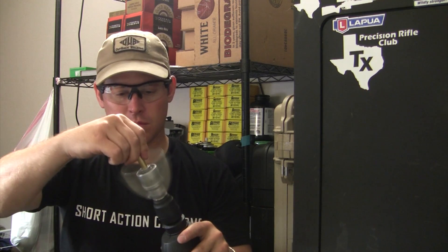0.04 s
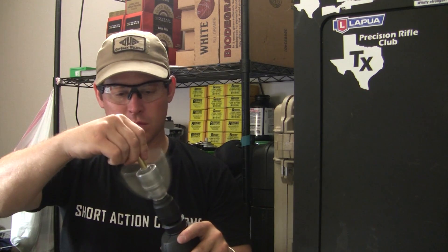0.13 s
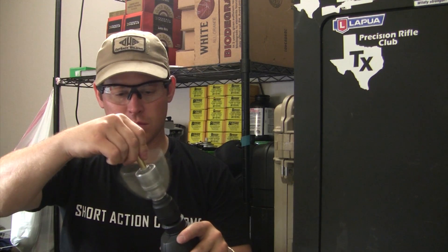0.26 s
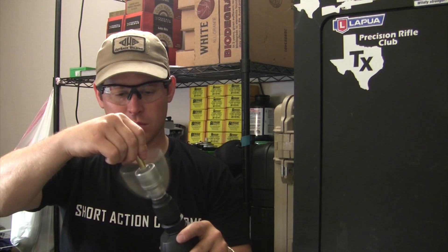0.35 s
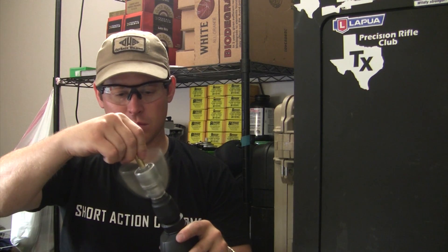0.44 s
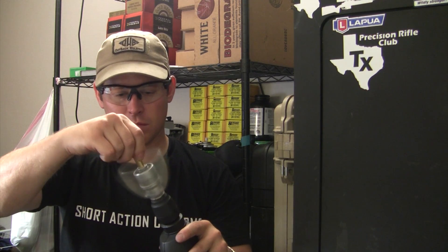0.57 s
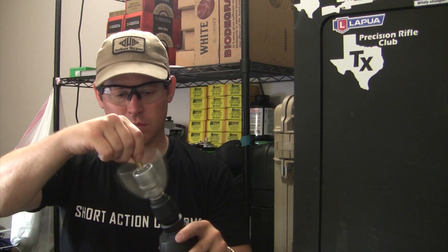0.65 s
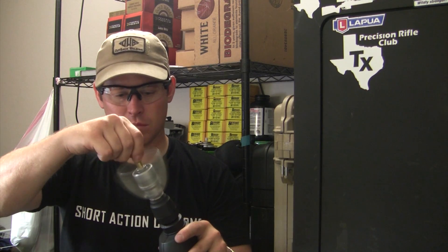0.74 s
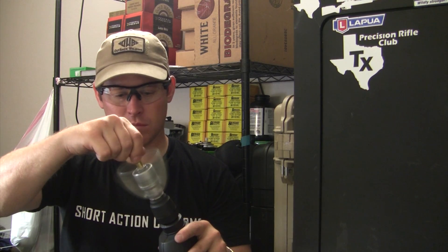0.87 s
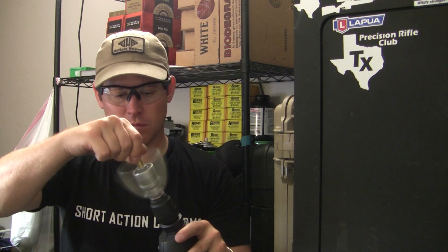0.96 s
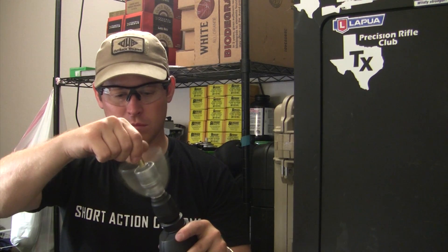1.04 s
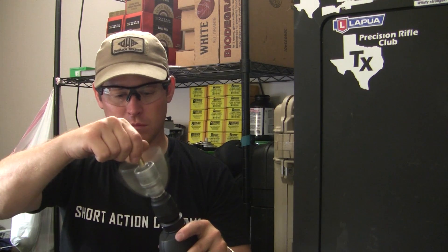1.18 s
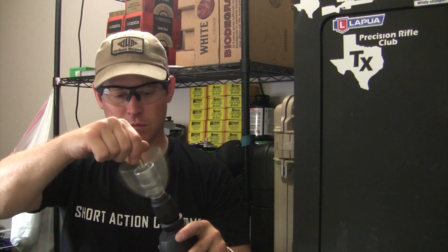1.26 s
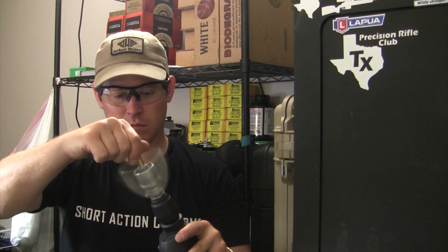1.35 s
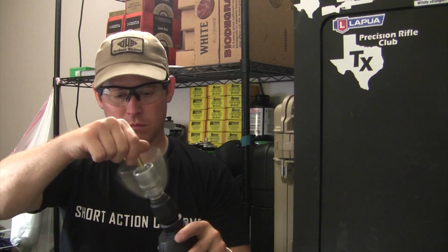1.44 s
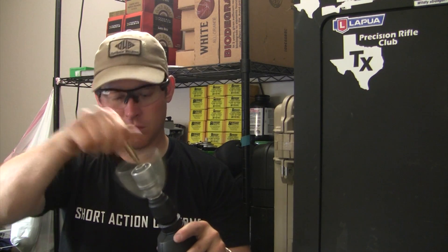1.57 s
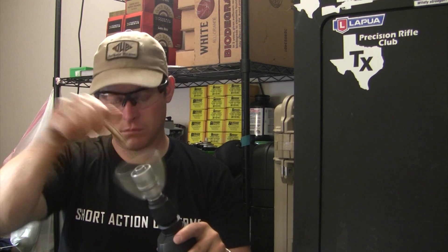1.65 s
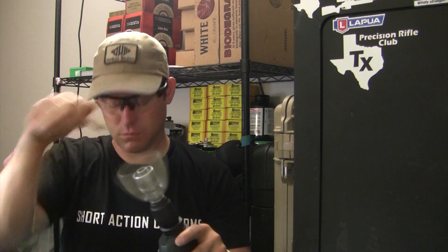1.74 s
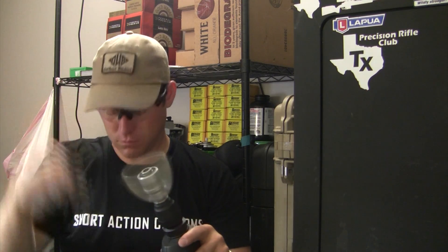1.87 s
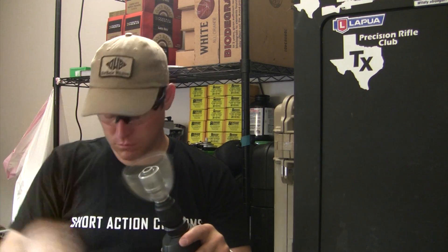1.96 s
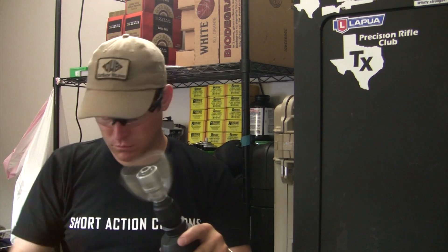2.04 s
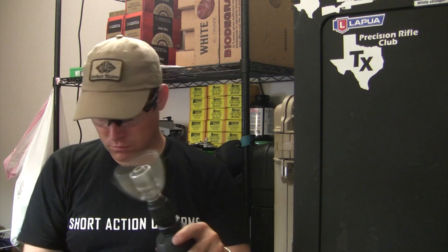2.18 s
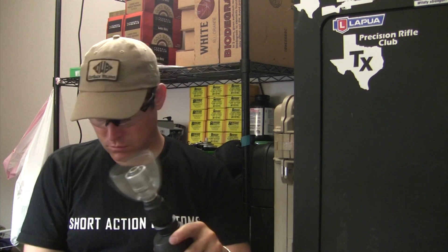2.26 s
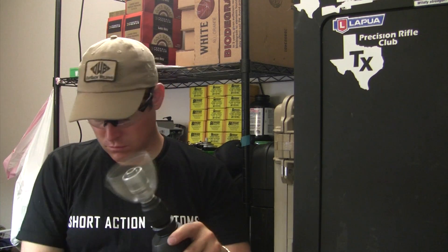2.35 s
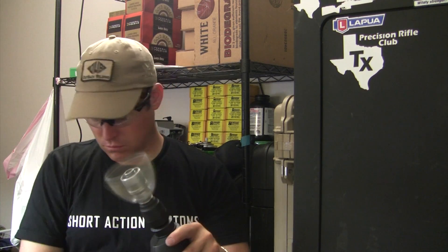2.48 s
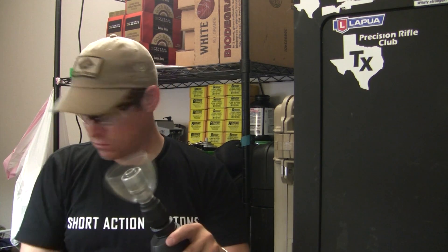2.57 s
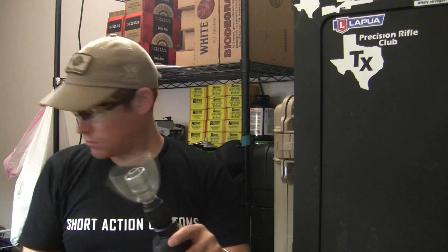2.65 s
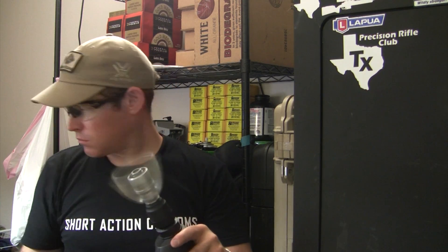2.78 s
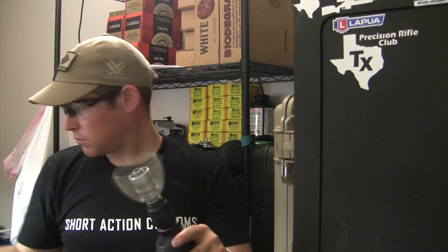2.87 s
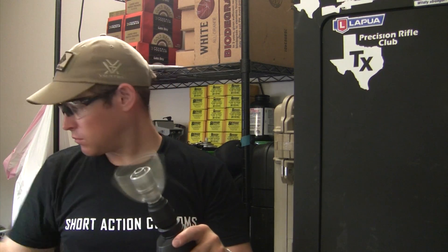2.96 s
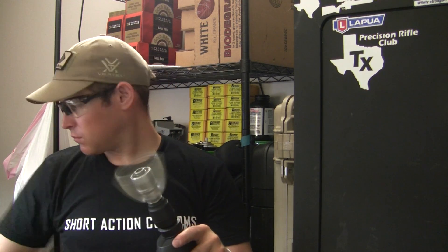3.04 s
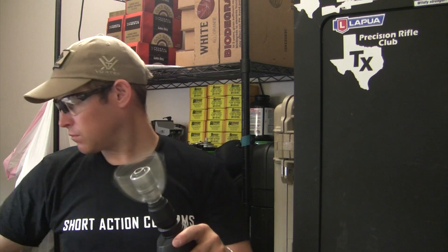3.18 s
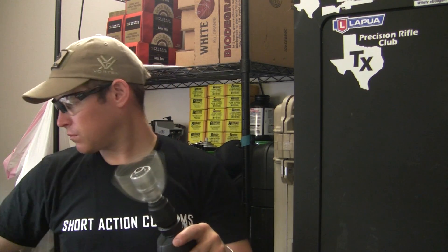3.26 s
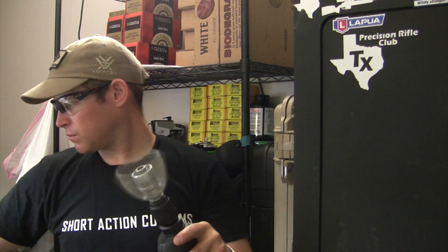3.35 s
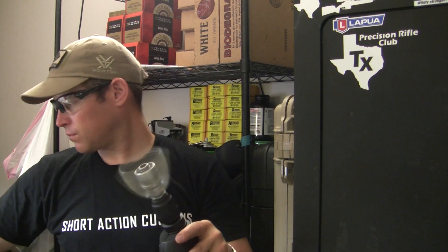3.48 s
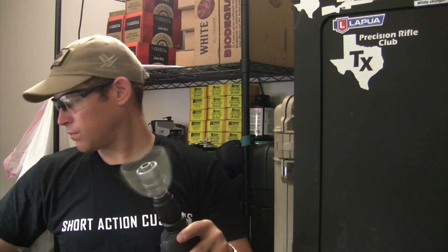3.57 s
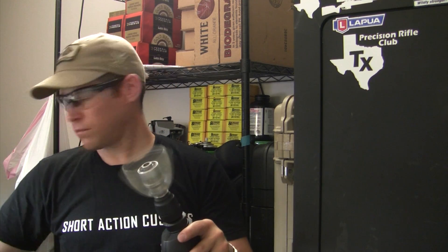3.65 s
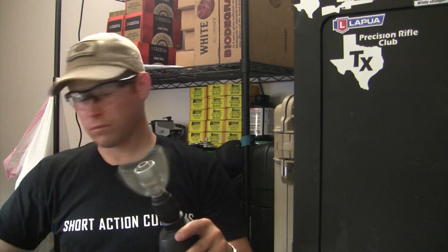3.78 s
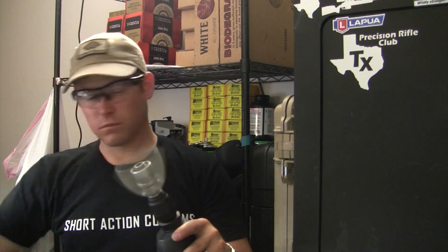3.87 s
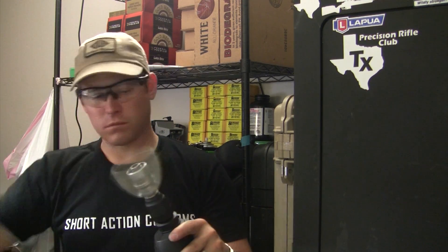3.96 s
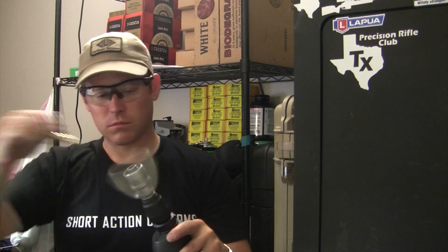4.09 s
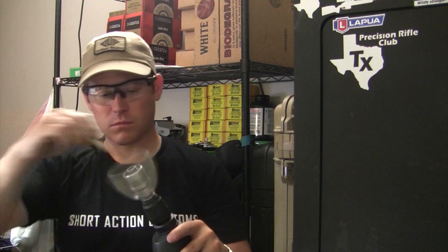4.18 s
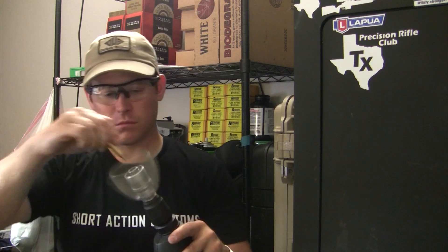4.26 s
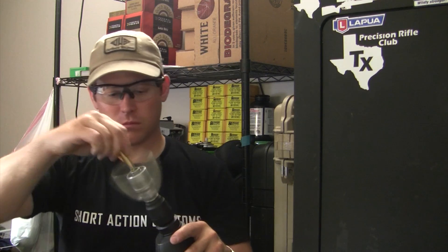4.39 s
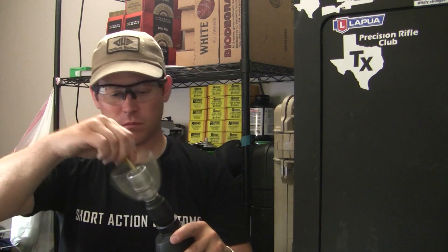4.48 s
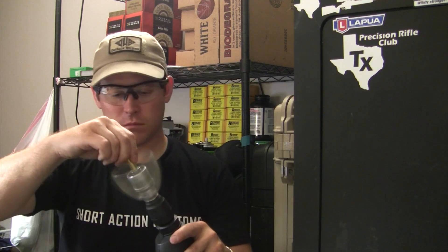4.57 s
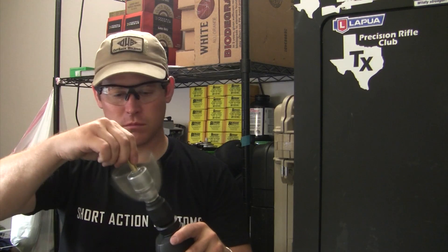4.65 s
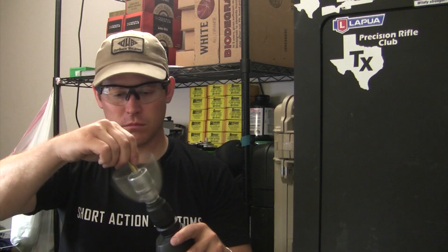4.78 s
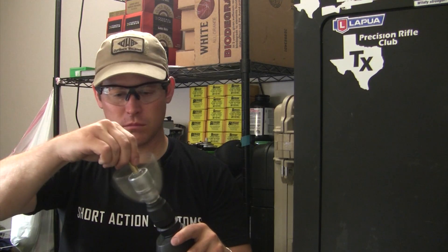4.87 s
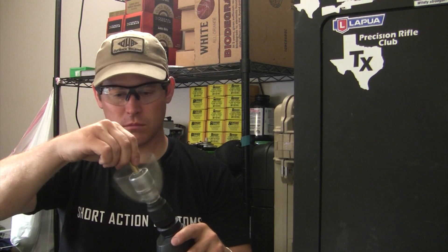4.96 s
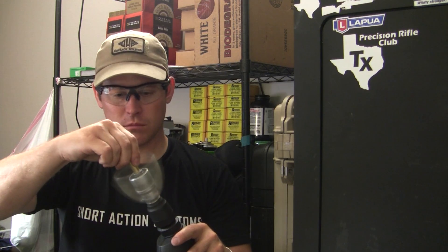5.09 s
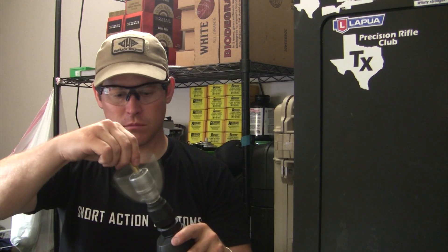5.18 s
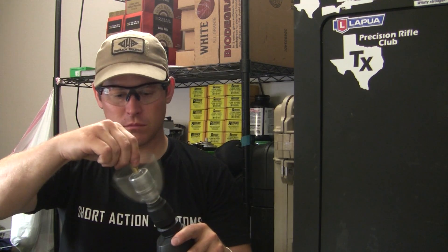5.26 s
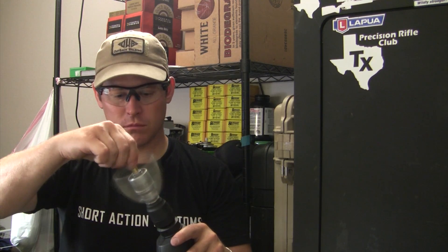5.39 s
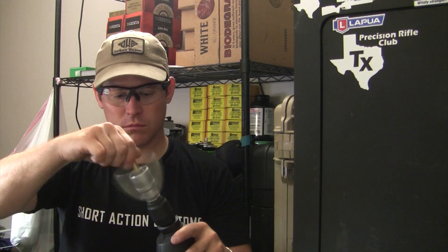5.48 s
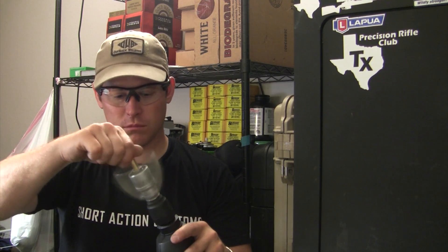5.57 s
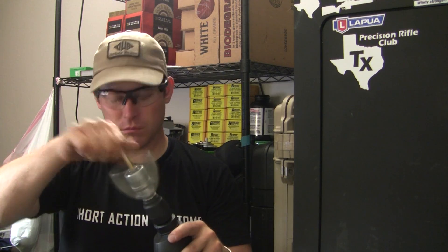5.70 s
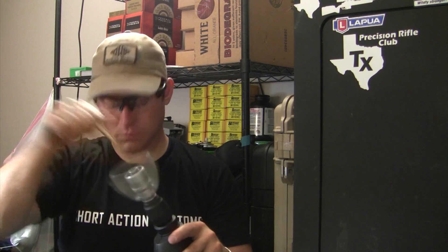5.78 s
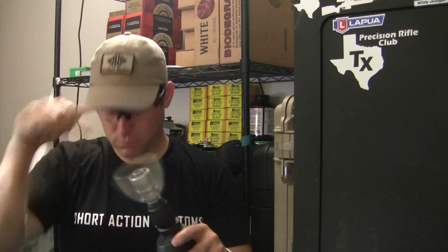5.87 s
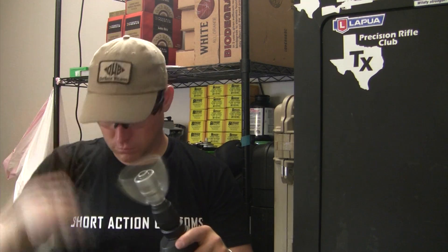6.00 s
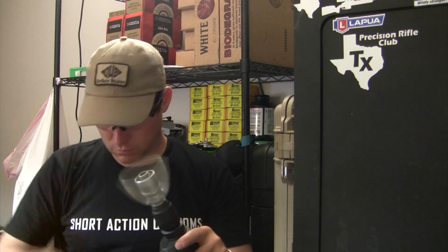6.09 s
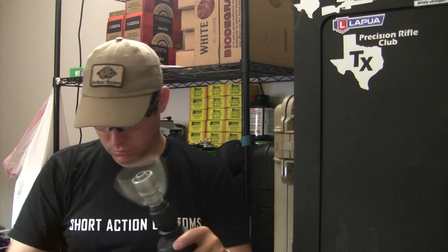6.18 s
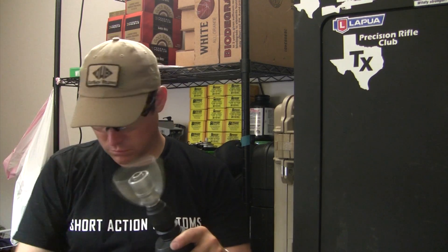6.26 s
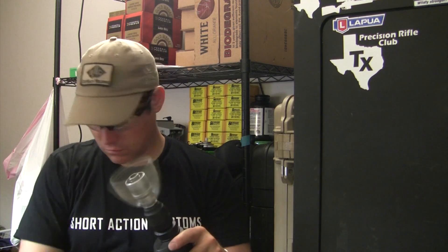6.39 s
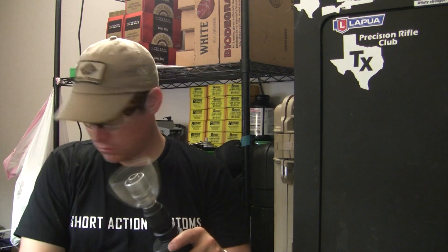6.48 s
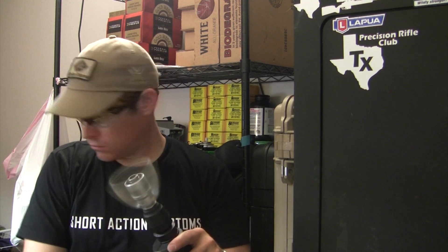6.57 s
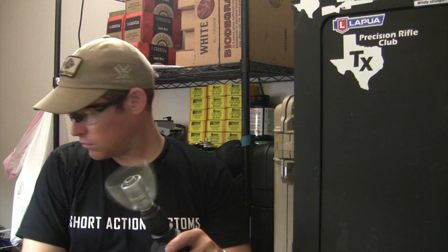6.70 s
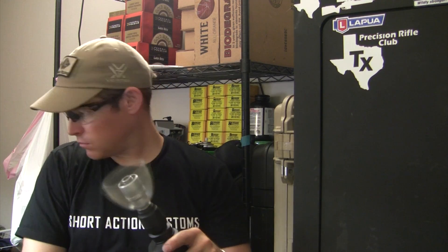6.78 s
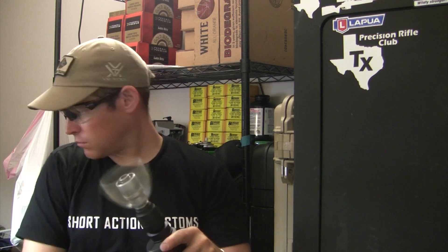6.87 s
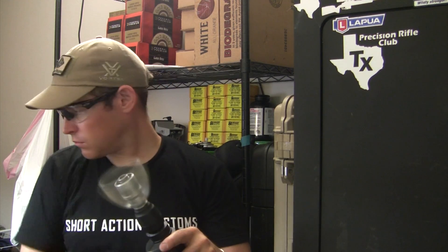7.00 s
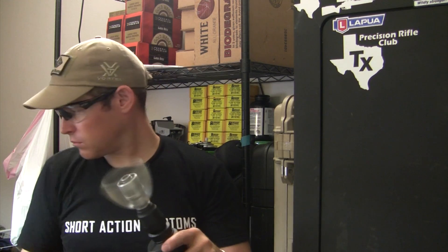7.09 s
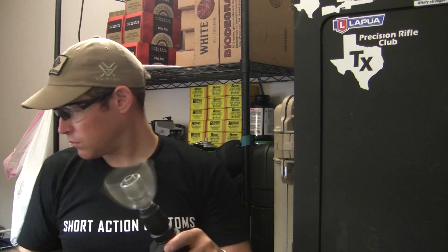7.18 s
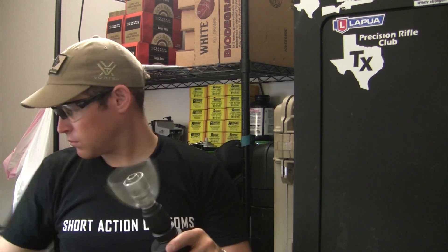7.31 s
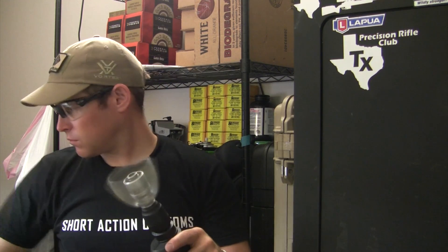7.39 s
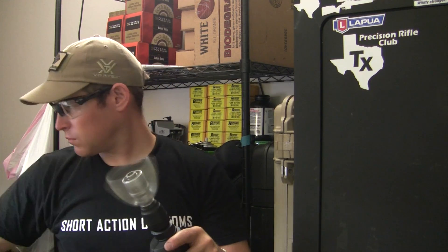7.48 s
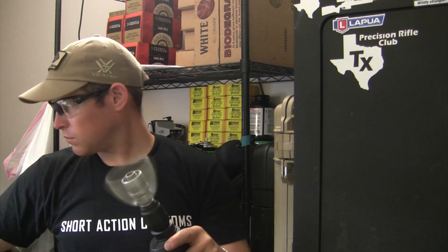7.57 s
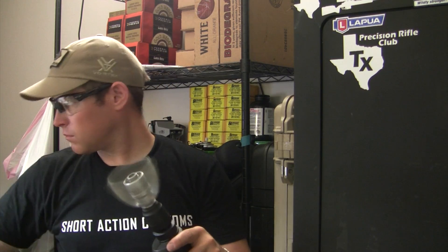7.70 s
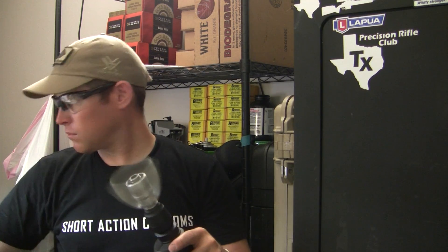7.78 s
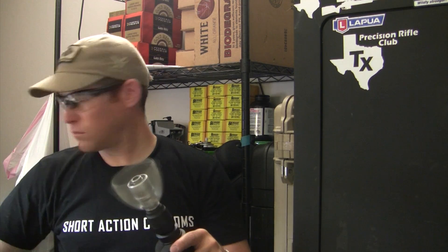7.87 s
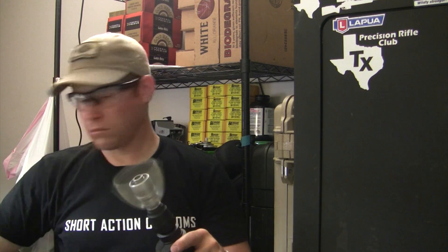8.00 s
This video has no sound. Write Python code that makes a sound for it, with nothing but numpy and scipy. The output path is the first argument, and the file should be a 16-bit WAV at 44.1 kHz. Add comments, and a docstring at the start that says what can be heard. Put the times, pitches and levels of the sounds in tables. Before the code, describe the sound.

A handheld electric drill whines nonstop in a workshop, bogging and rasping as brass is scraped, then running free with loose rattles and tiny metallic clinks.

```python
"""Hand drill trimming brass cases

Workshop, a mains drill in the hand a metre or two from the camera's two microphones, spinning a small cutter.
Slot tones with mains sidebands make the whine, once-a-turn noise rings the chuck, shaped noise is cooling air.
Twice a brass case is on the cutter: the motor slows, gear orders sing and rough noise scrapes.
Loose cases clink as decaying sines; low hum and treble hiss lie behind, and noise tails spread the reflections."""
import sys
import numpy as np
from scipy import signal
from scipy.fft import rfft, irfft, next_fast_len
from scipy.io import wavfile
from scipy.ndimage import map_coordinates

SR = 44100
rng = np.random.default_rng(int(sys.argv[2]) if len(sys.argv) > 2 else 0)


def digitize_waveform(pressure):
    """Quantize a signal to 16-bit integers and store it at the path in sys.argv[1].

    Rows of a 2-D input are taken as channels; values are limited to [-1, 1].
    """
    field = np.atleast_2d(pressure).T
    bounded = np.clip(field, -1, 1)
    quanta = np.round(bounded * 32767).astype(np.int16)
    wavfile.write(sys.argv[1], SR, quanta)


N = 354563

# levels of the running drill's sounds over time
# [t/s, whine level/dB, shell rattle level/dB, cooling air level/dB]
DRILL = [(0, -24, -27.5, -19), (.3, -23, -30, -25), (.7, -24.5, -26.5, -34.5), (1.05, -24.5, -31.5, -35.5),
         (1.3, -30, -38.5, -31), (1.5, -26.5, -32.5, -33), (1.62, -24, -34.5, -35),
         (1.76, -29.5, -31.5, -38), (1.85, -24, -31.5, -40), (2.0, -31, -33.5, -35),
         (2.19, -25.5, -32.5, -34.5), (2.35, -32.5, -32, -35.5), (2.5, -25.5, -32, -35.5),
         (2.62, -31.5, -32.5, -36.5), (2.72, -30, -31, -34.5), (2.83, -33.5, -31.5, -35.5),
         (3.0, -30, -30.5, -35), (3.2, -32.5, -38, -35.5), (3.4, -26.5, -36.5, -35.5),
         (3.6, -27.5, -33, -37.5), (3.9, -36.5, -37, -36), (4.5, -34, -35.5, -35.5), (4.8, -30, -37, -33),
         (5.1, -33, -33, -38), (5.35, -33, -38, -43), (5.55, -36, -37.5, -38), (5.75, -33, -39, -38),
         (6.3, -35.5, -35.5, -34.5), (6.9, -34.5, -37.5, -35.5), (7.5, -34, -36, -34.5),
         (8.04, -33.5, -34.5, -36)]
# armature speed while the cutter brakes it, one table a case [t/s, speed/turns per s]
BRAKED = [
    [(0, 236), (.15, 230.5), (.3, 226.5), (.55, 223.2), (1, 221.3), (1.5, 220.5), (1.65, 222.5)],
    [(4.6, 246.6), (4.8, 239.8), (5.05, 229.4), (5.3, 222.2), (5.55, 221), (5.7, 221.6), (5.8, 223.5)],
]
# return towards free speed after release, one row a case [free speed/turns per s, time constant/s]
RECOVER = [(247.1, .87), (250.5, 1.12)]
# mains sidebands of the slot whine {multiple of mains: level/dB}
SIDEBANDS = {-6: -12, -5: -18, -4: -5, -3: -14, -2: -1, -1: -9, 0: 0, 1: -8, 2: -1, 3: -9, 4: -5, 5: -13, 6:
             -12}
# brightest pitch within the whine [t/s, f/Hz]
FOCUS = [(0.0, 2800), (0.87, 2670), (1.41, 2800), (1.59, 2660), (1.72, 2860), (1.79, 2680), (1.95, 2960),
         (2.08, 2700), (2.28, 2930), (2.89, 2980), (3.24, 2760), (3.38, 2930), (3.89, 2890), (4.72, 2950),
         (5.17, 2700), (5.96, 2650), (6.07, 2900), (6.25, 2660), (6.47, 2920), (6.54, 2700), (6.7, 2870),
         (7.26, 2830), (7.72, 3000), (8.04, 2780)]
# armature orders when running free {multiple of speed: level/dB}
FREE_ORDERS = {3: -1, 4: -16.5, 6: -18, 16: -19, 23: -13, 25: -11}
# how well the shell radiates motor tones [f/Hz, level/dB]
SHELL = [(600, 2), (680, -19), (735, -5), (850, -8), (985, -1.5), (1150, 11), (1450, -34), (2300, 5.5),
         (2680, -1), (3000, -4), (3300, -6), (4200, 4.5), (8000, -16)]
# narrow resonances of the shell and chuck lit by a gliding motor tone [f/Hz, width/Hz, level/dB]
BLOOMS = [(2597, 12, 4), (2672, 14.7, 13), (2720, 12, 8.5), (2820, 17.3, 11), (2890, 32, 4.5),
          (2926, 52, 4), (2997, 46, 13.5), (3163, 61, 9), (3200, 20, 22), (4168, 51, 1), (4452, 57, 1),
          (5320, 31, 9), (5563, 27, 20), (5787, 40, 11)]
# double slot tone [t/s, level/dB]
DOUBLE = [(0, -40), (1.6, -39), (2.3, -43.5), (3.3, -40.5), (3.5, -54), (3.7, -44), (4.5, -42.5),
          (5.7, -51), (6.2, -44), (6.9, -44.5), (8.04, -43.5)]
# looseness of the cutter in the chuck
# [t/s, knock level/dB, main chuck mode level/dB, high ticking level/dB]
SLACK = [(0, -62, -62, -70), (1.5, -47, -37, -69), (1.8, -31.5, -45, -42), (2.0, -34, -43, -58),
         (2.3, -38.5, -50, -52), (2.55, -36, -42, -53), (3.0, -43.5, -47, -59), (3.3, -41, -42, -56),
         (3.7, -41.5, -49, -43.5), (4.0, -39.5, -41, -54), (4.4, -42, -46, -47), (4.65, -40, -30, -53),
         (5.0, -61, -58, -70), (5.7, -49, -56, -70), (6.0, -39.5, -45, -60), (6.25, -39, -39, -54),
         (6.55, -39, -48, -58), (7.0, -43, -48, -55), (7.1, -49, -54, -62), (7.15, -36, -35, -52),
         (7.45, -46, -44, -46), (7.7, -36.5, -46, -52), (8.04, -40, -44, -42)]
# chuck resonances, the 4420 Hz main mode first [f/Hz, width/Hz, relative level/dB]
CHUCK = [(4420, 70, 0), (4160, 110, -2), (4640, 140, -6), (4915, 90, -7), (3500, 200, -9), (4600, 1200, 0),
         (7200, 1500, -12)]
# gear tones ticking with the knocks, low and high {multiple of speed: relative level/dB}
TICK_ORDERS = {18: 0}
HIGH_TICK_ORDERS = {30: 0, 31: -2}
# plastic shell resonances [f/Hz, width/Hz, relative level/dB]
HOUSING = [(753, 160, -2.5), (983.5, 46, -3.5), (1168, 214, -1.5), (1451, 29, -7), (1406, 280, -3.5),
           (1658, 330, -6)]
# hardest chuck knocks [t/s, envelope peak level/dB]
KNOCKS = [(1.7851, -30), (1.855, -30), (1.9967, -33), (2.395, -37), (2.522, -28), (2.5853, -29),
          (3.3007, -29), (3.4613, -31), (3.5631, -22.5), (3.6584, -27), (3.85, -29), (3.9163, -30),
          (4.0107, -25.5), (4.3, -30.5), (4.3279, -27.5), (4.578, -16.5), (4.609, -20.5), (4.646, -28),
          (4.682, -30), (4.7125, -30), (4.748, -27), (4.776, -31), (4.89, -34), (6.24, -41), (7.12, -31),
          (7.3146, -37), (7.602, -23), (7.7265, -22.5), (7.7581, -24.5), (7.9491, -28)]
# clearest shell rattles [t/s, peak level/dB, f/Hz]
RATTLES = [(1.858, -24, 1380), (2.032, -25, 774), (2.103, -25, 698), (2.327, -22, 1110), (2.42, -24, 1002),
           (2.451, -25, 740), (2.552, -20.5, 1413), (2.671, -27, 1050), (2.979, -23.5, 734),
           (3.133, -22.5, 734), (3.456, -28.5, 724), (3.672, -22.5, 732), (4.453, -24, 748),
           (6.889, -27.5, 716), (7.902, -26, 735)]
# chips snapping off [t/s, envelope peak level/dB, f/Hz]
SNAPS = [(4.708, -35, 13700), (4.737, -40, 12500), (4.8085, -35, 13100), (4.852, -40, 8900),
         (4.89, -37, 13000), (4.9097, -35, 12600), (5.0044, -36, 12000), (5.0, -39, 9700)]
# case on the cutter, one table a case [t/s, scrape level/dB, hard bite level/dB, body shake level/dB]
CUTS = [
    [(0, -18.5, -28.5, -52), (.1, -18, -28, -53), (.35, -20, -30, -76), (.7, -19, -33, -73),
     (1.3, -19, -39.5, -76), (1.5, -20, -49, -78), (1.58, -23.5, -59, -81), (1.66, -28, -63, -80),
     (1.8, -51, -70, -90)],
    [(4.55, -44, -62, -80), (4.59, -29.5, -41, -72), (4.65, -26.5, -37, -69), (4.7, -25.5, -39, -64),
     (4.8, -26.5, -35.5, -60), (4.92, -23.5, -39, -61), (5.02, -25, -37, -62), (5.14, -26.5, -40, -56),
     (5.22, -27.5, -41, -72), (5.4, -29, -43, -71), (5.72, -29.5, -47.5, -75), (5.9, -41, -70, -87)],
]
# scrape spectrum [f/Hz, relative level/dB per Hz]
SCRAPE = [(180, -61), (300, -56), (583, -66), (659, -6.5), (898, -10), (1340, -1.5), (1830, -1),
          (2300, -12), (2640, -2), (3550, -10), (4010, 1), (4400, -1.5), (5900, -5), (10600, -49),
          (12000, -58), (15600, -71), (22000, -120)]
# case and cutter resonances while scraped [f/Hz, width/Hz, relative level/dB]
BRASS = [(1407, 25, 2), (1804, 77, -0.5), (3470, 280, 6.5), (4570, 92, 9), (4130, 37, 3), (5500, 32, -7),
         (5980, 89, -5), (8040, 560, -2)]
# sizzle spectrum of the hard bite [f/Hz, relative level/dB per Hz]
BITE = [(5000, 1), (7000, 17.5), (9000, 7.5), (11000, 7), (13500, -6.5), (16000, -3)]
# resonances of the hand-held body in the bite [f/Hz, width/Hz, relative level/dB]
THUD = [(159, 35, -1), (205, 35, 7), (346, 140, 3)]
# jumps of the body in the hand [t/s, envelope peak level/dB]
THUMPS = [(4.855, -57), (5.005, -56), (5.142, -57)]
# gear tones: pinion mesh, chatter, squeal {multiple of speed: relative level/dB}
MESH_ORDERS = {6: 0, 7: -9, 12: -8}
CHATTER_ORDERS = {7: -4.5, 8: 0, 9: -21}
SQUEAL_ORDERS = {18: 0, 20: -18, 21: -9, 26: -9, 27: -40}
# moments when a tone sings out, by tone name [centre t/s, half length to 1/e /s, peak level/dB]
SINGS = {"mesh": [(.07, 0.15, -22), (1.2, 0.2, -30.5), (1.53, 0.041, -33), (4.74, 0.082, -27),
         (4.87, 0.026, -24), (4.93, 0.03, -25.5), (5.01, 0.064, -23)], "chatter": [(.18, 0.05, -31),
         (.36, 0.09, -28.5), (.86, 0.053, -30), (1.38, 0.18, -28), (4.69, 0.041, -37), (4.81, 0.047, -26),
         (5.01, 0.027, -30), (5.115, 0.055, -24)], "squeal": [(.14, 0.043, -25), (.68, 0.13, -24.5),
         (.98, 0.12, -37), (1.35, 0.41, -30), (1.59, 0.027, -29), (5.01, 0.053, -25.5), (5.12, 0.13, -37),
         (5.31, 0.076, -28.5), (5.5, 0.082, -27.5)], "double": [(2.01, 0.037, -30), (2.14, 0.027, -32),
         (2.96, 0.11, -36), (4.97, 0.063, -33), (6.32, 0.035, -39)]}
# loose cases touching [t/s, level/dB, extra level of the lowest ring/dB]
CLINKS = [(1.6521, -39, -16), (1.8547, -51, 1), (5.8077, -28, -27), (6.769, -36, -20), (6.842, -20, -13.5),
          (7.0678, -21, -35)]
# rings of a brass case [f/Hz, relative level/dB, 60 dB decay t/s]
CASE = [(10720, 11.5, 0.063), (13870, -18.5, .09), (15050, -10, 0.12)]
# cooling air spectrum [f/Hz, relative level/dB per Hz]
AIR = [(260, -65), (450, -23.5), (617, -10.5), (728, 3.5), (894, 0), (985, -3), (1470, -5), (2340, -10),
       (2920, -10), (3390, -7), (4280, -6.5), (5790, -7.5), (6380, -12.5), (7520, -15.5), (12000, -25),
       (15600, -84), (22000, -120)]
# narrow rings under the cooling air [f/Hz, width/Hz, relative level/dB]
RINGS = [(646, 22, 6), (800, 48, 0), (910, 57, -32), (1433, 6.8, -21), (1250, 2.8, 9)]
# low workshop noise spectrum [f/Hz, relative level/dB per Hz]
SHOP = [(15, -72), (25, -42), (59, -30), (91, -34), (107, -16.5), (156, -11), (188, -12), (203, -17),
        (295, -0.5), (399, -2.5), (500, 5), (650, 7), (1100, -120)]
# steady treble hiss spectrum [f/Hz, relative level/dB per Hz]
HISS = [(5000, -13), (8000, -5), (12000, 15), (15500, 11)]
# workshop hum [f/Hz, width/Hz, relative level/dB]
HUM = [(60, 7.3, -15), (160.3, 4.7, -12), (226.6, 8, -0.5), (307.1, 12.5, 4)]
# stereo side signal of the reflections, re mid [f/Hz, level/dB]
WIDTH = [(25, -20), (60, -11), (110, -13), (200, -16), (380, -15), (700, -17), (1290, -7.5), (2380, -7),
         (4400, -4.5), (8120, -1), (15000, 0)]

SLOTS, CHUCK_RATIO, MAINS_HZ = 12, 7.8, 60  # ratio: armature turns per chuck turn
FOCUS_HZ, FOCUS_DB = 223, -8  # half width to 1/e, deepest dip outside it
TICK_DB = -6  # low ticking tone re knocks
MESH_DB, CHATTER_DB, SQUEAL_DB = -60, -50, -19.5  # steady gear tones re scrape
WANDER_DB = 1.5  # scale of their slow level drift
SHOP_DB, HISS_DB = -49.5, -58
ROOM_T60_S, SWAY_RAD = 0.11, 0.71  # reflections: decay time, scale of their shifting balance
LEAN_DB = -1  # first channel re second
TOP_HZ = 16050  # top of the microphone band


def speed():
    """Armature turns per s: braked by the cutter, then closing on the free speed exponentially."""
    t, out = np.arange(N) / SR, np.zeros(N)
    for table, (free, tau_s) in zip(BRAKED, RECOVER):
        end_s, end = table[-1]
        back = free - (free - end) * np.exp(-np.maximum(t - end_s, 0) / tau_s)
        braked_or_back = np.where(t < end_s, columns(table)[0], back)
        out = np.where(t < table[0][0], out, braked_or_back)
    return out


def whine(turns):
    """Armature slots pass the brushes; mains current modulates their tone and the arcing noise around it."""
    mains = 2 * np.pi * MAINS_HZ * np.arange(N) / SR
    carrier = 2 * np.pi * SLOTS * turns + .3 * walk(24)
    off_focus = (SLOTS * np.gradient(turns) * SR - columns(FOCUS)[0]) / FOCUS_HZ
    sidebands = []
    for k, db in SIDEBANDS.items():
        dip_db = FOCUS_DB * (1 - np.exp(-(off_focus + k * MAINS_HZ / FOCUS_HZ) ** 2))
        gain = undb(db + dip_db + 2.2 * walk(7) + 1.5 * walk(30))
        # sidebands keep step only loosely, so the buzz is uneven
        sidebands.append(gain * np.sin(carrier + k * mains + 1.1 * walk(9)))
    slots = unit(sum(sidebands))
    free = orders(turns, FREE_ORDERS, 4.5, 12., 1.2)
    arc_gain = undb(2.2 * np.cos(2 * mains) + 0.47 * np.cos(mains))
    arc = arc_gain * ring(rng.standard_normal(N), [(2960, 860, 0)])
    throb = wobble(turns, 1.4, .6) * undb(1. * np.cos(mains))
    bloomed = undb(-8.5) * bloom(throb * colour(slots, SHELL))
    return bloomed + throb * (undb(-0.5) * colour(free, SHELL) + undb(-8.0) * arc)


def bloom(x):
    """Narrow shell and chuck resonances add to whatever tone falls on them."""
    return x + sum(undb(db) * signal.lfilter(*signal.iirpeak(hz, hz / w, SR), x) for hz, w, db in BLOOMS)


def double_slot_tone(turns):
    """A tone at twice the slot rate drifts in level and sings out at moments."""
    gain = sing(undb(columns(DOUBLE)[0]), 0, SINGS["double"])
    return gain * orders(turns, {2 * SLOTS: 0}, 3., 35., .8)


def knocks(turns):
    """The loose cutter jolts once a chuck turn and rings each chuck mode unevenly; gear tones tick along."""
    knock_db, ring_db, high_db = columns(SLACK)
    jolt = wobble(turns, 8., 1.8) * undb(1.5 * walk(4)) * rng.standard_normal(N)
    main, *rest = [undb(mode[2] + 2.5 * walk(14)) * ring(jolt, [mode]) for mode in CHUCK]
    tick = wobble(turns, 9., 2.) * orders(turns, TICK_ORDERS, 4., 30., 1.2)
    high = wobble(turns, 8., 3.5) * orders(turns, HIGH_TICK_ORDERS, 4.5, 25., 1.5)
    knock = unit(sum(rest)) + undb(TICK_DB) * tick
    return undb(knock_db) * knock + undb(ring_db) * main + undb(high_db) * high


def rattle():
    """Gear play shakes the plastic shell in uneven bursts, each mode on its own."""
    modes = []
    for mode in HOUSING:
        shake = undb(2.36 * walk(30) + 2. * walk(6)) * rng.standard_normal(N)
        modes.append(undb(mode[2]) * ring(shake, [mode]))
    return unit(sum(modes))


def hits():
    """Single hard events: knocks on the main chuck mode, shell rattles as sines, chip snaps as noise."""
    t = np.arange(N) / SR
    steel = tones([(2 * np.pi * CHUCK[0][0] * t, 0)], 0.4, 27.0, 0.45)
    out = bursts(KNOCKS, 0.0053) * steel
    for s, peak_db, hz in SNAPS:
        out += bursts([(s, peak_db)], 0.0036) * ring(rng.standard_normal(N), [(hz, hz / 7, 0)])
    for s, peak_db, hz in RATTLES:
        i = slice(int(s * SR), int(s * SR) + SR // 8)
        out[i] += bursts([(s, peak_db)], 0.0056)[i] * np.sin(2 * np.pi * hz * t[i])
    return out


def cutter(turns):
    """Case on cutter: scrape, strained gear tones, sizzle and shaking body, sounding only in contact or swells."""
    t = np.arange(N) / SR
    cut, bite, shake = sum(undb(columns(c)) * ((t >= c[0][0]) & (t < c[-1][0])) for c in CUTS)
    # each tone is chopped by the chuck turn and roughened by stick and slip
    mesh = wobble(turns, 3.5, 1.2) * orders(turns, MESH_ORDERS, 4., 40., 1.3)
    chatter = wobble(turns, 3.5, 1.2) * orders(turns, CHATTER_ORDERS, 4., 40., 1.3)
    squeal = wobble(turns, 3., 1.) * orders(turns, SQUEAL_ORDERS, 2.2, 45., .7)
    gears = sing(cut, MESH_DB, SINGS["mesh"]) * mesh
    gears += sing(cut, CHATTER_DB, SINGS["chatter"]) * chatter
    gears += sing(cut, SQUEAL_DB, SINGS["squeal"]) * squeal
    thud = undb(2.5 * walk(20)) * ring(rng.standard_normal(N), THUD)
    body = (shake + bursts(THUMPS, 0.0047)) * thud
    return cut * scrape(turns) + gears + bite * sizzle(turns) + body


def scrape(turns):
    """Dense brass chips and strained gear flanks, heavier at one point of each chuck turn."""
    chips = rng.standard_normal(N) * undb(3 * np.minimum(rng.exponential(size=N), 4))
    drive = unit(chips) + undb(-3) * unit(tooth_marks(turns))
    drive = drive * wobble(turns, 1., .25) * undb(1.5 * walk(130))
    # each band catches and slips on its own
    bands = [2 * np.sqrt(hz / SR) * walk(35) * ring(drive, [(hz, hz / 4, 0)])
             for hz in 800 * 1.3 ** np.arange(9)]
    ragged = drive + .8 * sum(bands)
    brass = sum(undb(mode[2] + 3.5 * walk(25)) * ring(drive, [mode]) for mode in BRASS)
    return unit(unit(colour(ragged, SCRAPE)) + undb(-10.0) * unit(brass))


def tooth_marks(turns, size=256, renew=14.):
    """Gear flank roughness: nearly the same each armature turn, worn into new patterns (renew per s)."""
    age = renew * np.arange(N) / SR
    marks = rng.standard_normal((int(age[-1]) + 2, size + 1))
    return map_coordinates(marks, [age, (turns % 1) * size], order=1)


def sizzle(turns):
    """Hard bite: ragged treble, each band flaring on its own and all with the chuck turn."""
    bands = [undb(2.4 * walk(45)) * ring(rng.standard_normal(N), [(hz, hz / 5, 0)]) * np.sqrt(hz)
             for hz in 5500 * 1.18 ** np.arange(7)]
    return wobble(turns, 0.3, 1.5) * undb(0.5 * walk(60)) * unit(colour(sum(bands), BITE))


def sing(base_gain, steady_db, table):
    """Gain of a tone that wanders on a base level and swells in bell-shaped moments."""
    t = np.arange(N) / SR
    swells = sum(undb(db) * np.exp(-((t - s) / half) ** 2) for s, half, db in table)
    return base_gain * undb(steady_db + WANDER_DB * walk(4.05)) + swells


def clinks():
    """Thin brass walls ring high and short; each mode beats with a close twin."""
    out, t = np.zeros(N), np.arange(SR // 5) / SR
    twins_hz = rng.uniform(40, 90, (len(CLINKS), len(CASE)))
    for (s, level_db, low_db), twin_hz in zip(CLINKS, twins_hz):
        i = int(s * SR)
        for (hz, db, t60), beat_hz, extra_db in zip(CASE, twin_hz, [low_db, 0, 0]):
            beat = 1 + 0.65 * np.cos(2 * np.pi * beat_hz * t)
            mode = np.sin(2 * np.pi * hz * t) * beat * np.exp(-np.log(1000) * t / t60)
            onset = np.minimum(t / 0.0018, 1)
            out[i:i + len(t)] += undb(level_db + db + extra_db) * mode * onset
    return out


def cooling_air():
    """Air through the drill: fluttering shaped noise over narrow steady rings."""
    air = undb(1.4 * walk(13)) * unit(colour(rng.standard_normal(N), AIR))
    return air + undb(-14.5) * ring(rng.standard_normal(N), RINGS)


def hiss():
    """Steady treble noise."""
    return undb(HISS_DB) * unit(colour(rng.standard_normal(N), HISS))


def workshop():
    """Background of the place: low noise, treble hiss and resonant hum."""
    low = undb(SHOP_DB) * unit(colour(rng.standard_normal(N), SHOP))
    return low + hiss() + undb(-61.5) * ring(rng.standard_normal(N), HUM)


def reflections(mid):
    """Shelves and walls reach the two microphones differently, in a shifting balance of two noise tails."""
    t = np.arange(SR // 2) / SR
    tails = rng.standard_normal((2, SR // 2)) * np.exp(-np.log(1000) * t / ROOM_T60_S)
    first, second = (signal.fftconvolve(mid, tail / np.linalg.norm(tail))[:N] for tail in tails)
    turn = SWAY_RAD * walk(4.7)
    return colour(np.cos(turn) * first + np.sin(turn) * second, WIDTH)


def undb(db):
    """Amplitude from dB."""
    return 10 ** (np.asarray(db) / 20)


def unit(x):
    """Scale to an rms of 1."""
    return x / np.sqrt(np.mean(x ** 2))


def columns(table):
    """Value columns of a timed table at every sample."""
    s, *cols = np.transpose(table)
    return np.array([np.interp(np.arange(N) / SR, s, c) for c in cols])


def colour(x, table):
    """Filter by [f/Hz, level/dB] points joined on a log frequency axis."""
    hz, db = np.transpose(table)
    size = next_fast_len(N)
    log_f = np.log(np.arange(size // 2 + 1) * SR / size + 1)
    return irfft(rfft(x, size) * undb(np.interp(log_f, np.log(hz), db)), size)[:N]


def ring(x, modes):
    """Sum of [f/Hz, width/Hz, level/dB] resonances, each applied twice; the sum has an rms of 1."""
    out = 0
    for hz, width, db in modes:
        peak = signal.iirpeak(hz, hz / width, SR)
        out = out + undb(db) * unit(signal.lfilter(*peak, signal.lfilter(*peak, x)))
    return unit(out)


def walk(rate):
    """Random values, rate per s, joined by straight lines; clipped so that rare extremes are absent."""
    points = np.clip(rng.standard_normal(N // 100), -1.7, 1.7)
    return 1.2 * np.interp(np.arange(N) * (rate / SR), np.arange(N // 100), points)


def tones(phases, flicker_db, rate, waver):
    """Sines on (phase, dB) pairs; each flickers in level and wavers in phase (radians) on its own."""
    out = 0
    for phase, db in phases:
        gain = undb(db + flicker_db * walk(rate))
        out = out + gain * np.sin(phase + rng.uniform(0, 2 * np.pi) + waver * walk(3 * rate))
    return unit(out)


def orders(turns, table, flicker_db, rate, waver):
    """Tones at multiples of the armature speed."""
    return tones([(2 * np.pi * k * turns, db) for k, db in table.items()], flicker_db, rate, waver)


def wobble(turns, depth_db, scatter_db):
    """Gain swelling once a chuck turn, since the cutter runs out of true; each turn has its own size."""
    chuck = turns / CHUCK_RATIO + 0.3
    size_db = scatter_db * rng.standard_normal(int(chuck[-1]) + 2)
    turn_db = np.interp(chuck, np.arange(len(size_db)), size_db)
    return unit(undb(turn_db + depth_db * np.cos(2 * np.pi * chuck)))


def bursts(table, rise_s):
    """Envelope with a rounded swell and longer fall for each [t/s, peak level/dB] row."""
    u, out = np.arange(SR // 8) / SR / rise_s, np.zeros(N + SR)
    for s, peak_db, *_ in table:
        out[int(s * SR):int(s * SR) + len(u)] += undb(peak_db) * u * np.exp(1 - u)
    return out[:N]


def scene():
    """Drill, cutter, loose cases and workshop, spread by the walls."""
    turns = np.cumsum(speed()) / SR
    whine_db, rattle_db, air_db = columns(DRILL)
    drill = undb(whine_db) * whine(turns) + undb(rattle_db) * rattle() + knocks(turns)
    drill += double_slot_tone(turns) + undb(air_db) * cooling_air()
    mid = drill + cutter(turns) + hits() + clinks() + workshop()
    side = reflections(mid) + hiss()
    return np.array([mid + side, mid - side]) * undb([[LEAN_DB / 2], [-LEAN_DB / 2]])


def record(dry):
    """The camera drops the deepest bass and cuts the top."""
    dry = signal.sosfilt(signal.butter(2, 45, "high", fs=SR, output="sos"), dry)
    return signal.sosfilt(signal.ellip(12, .2, 90, TOP_HZ, fs=SR, output="sos"), dry)


dry = scene()
out = record(dry)
digitize_waveform(out)
```